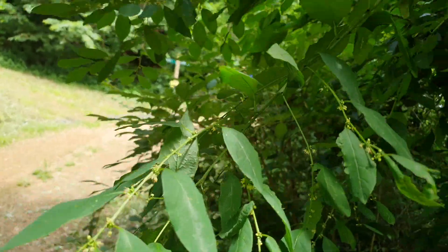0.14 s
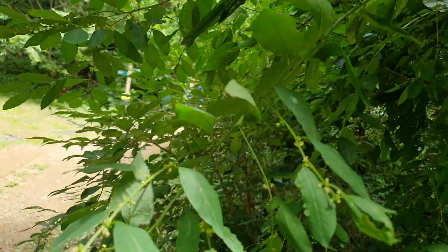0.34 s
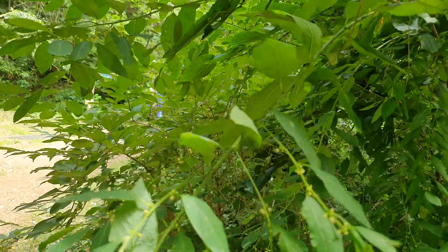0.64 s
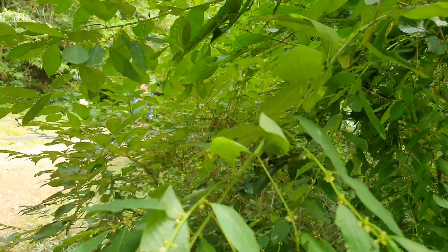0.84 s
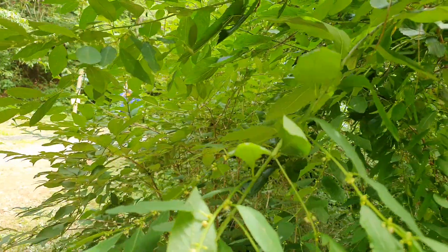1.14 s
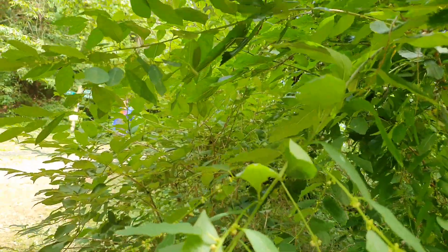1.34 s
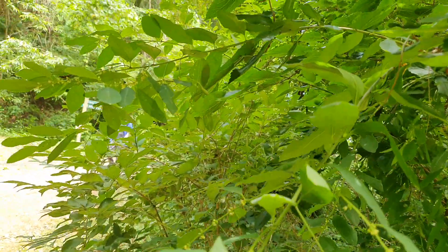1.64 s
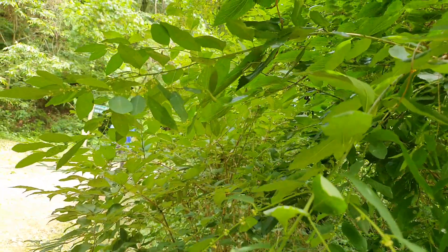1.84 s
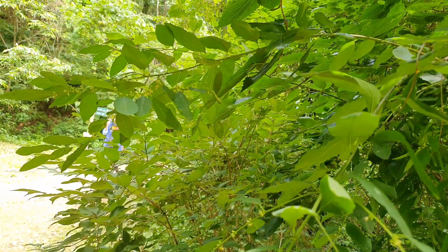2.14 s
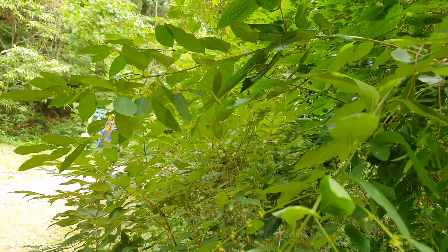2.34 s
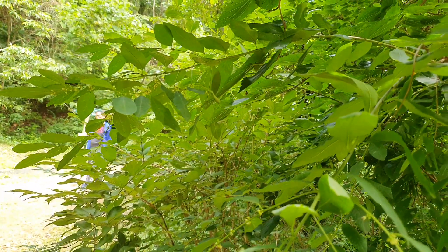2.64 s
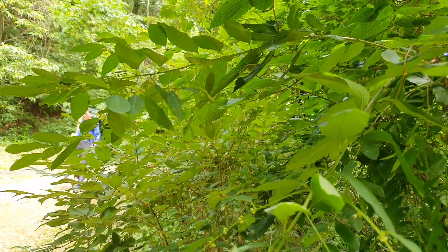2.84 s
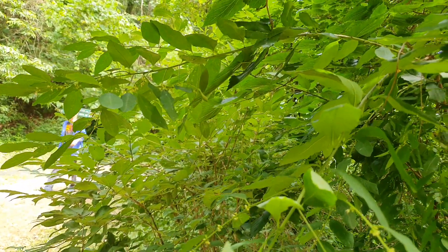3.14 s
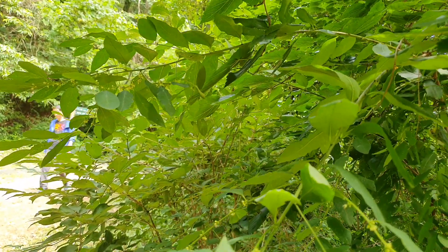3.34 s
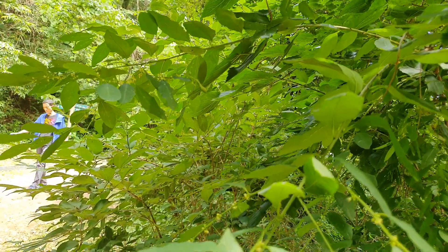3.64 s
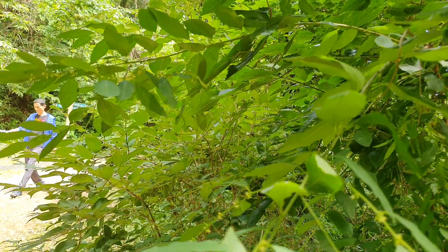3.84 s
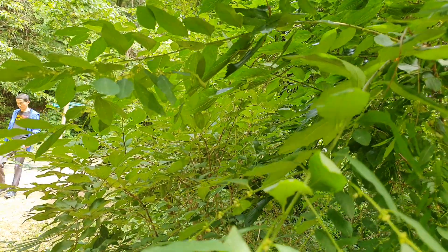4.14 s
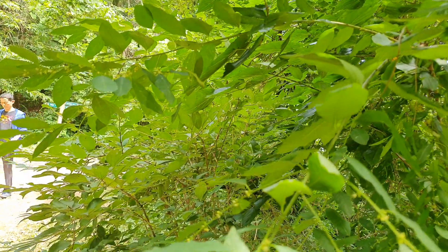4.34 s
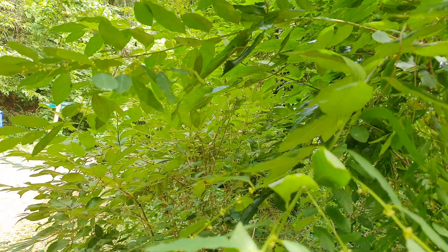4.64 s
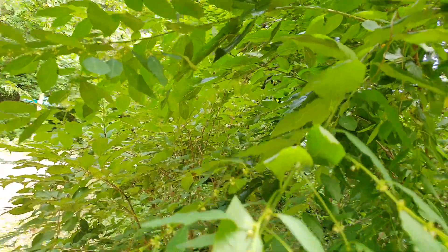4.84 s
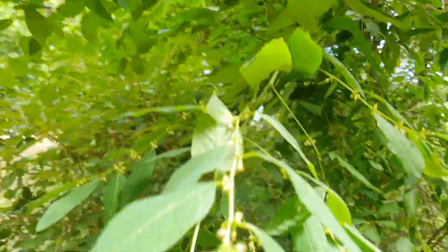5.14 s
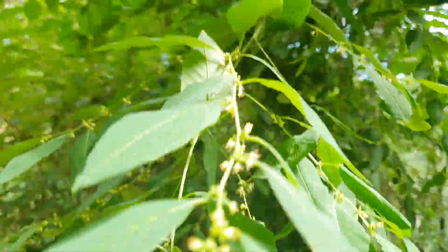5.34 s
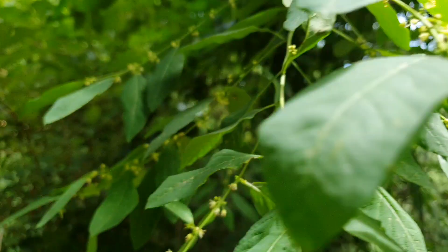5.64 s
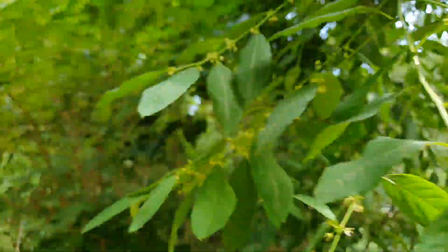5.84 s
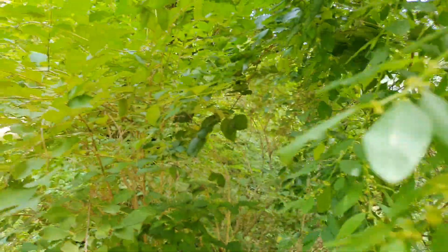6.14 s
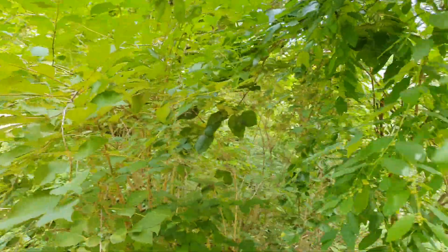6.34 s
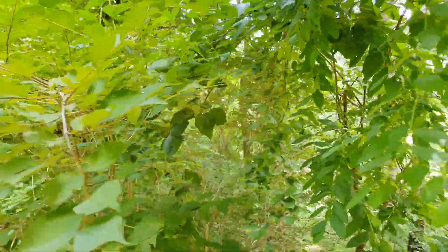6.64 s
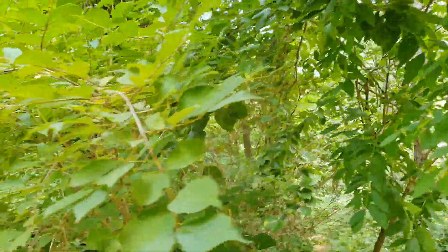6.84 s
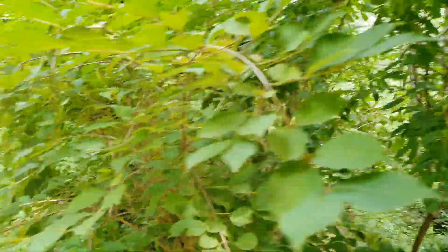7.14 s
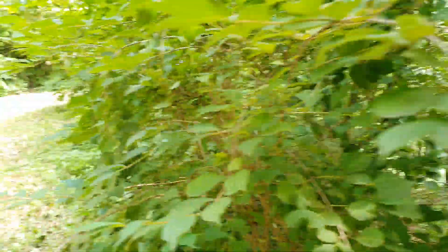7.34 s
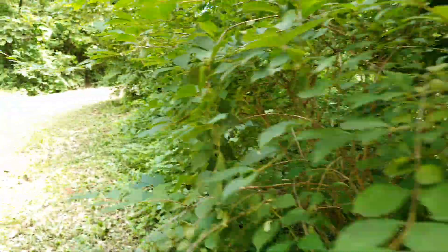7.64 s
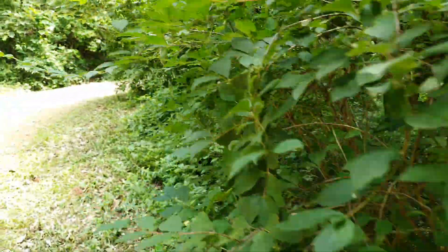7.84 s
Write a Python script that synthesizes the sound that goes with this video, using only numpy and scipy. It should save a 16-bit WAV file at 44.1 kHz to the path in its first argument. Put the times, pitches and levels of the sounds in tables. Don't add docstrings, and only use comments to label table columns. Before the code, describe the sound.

A dense summer insect chorus, with a held buzz turning into fast pulsing, soft cricket chirps, faint distant steps, then leafy ticks and handling bumps.

```python
import sys
import numpy as np
from scipy import signal
from scipy.fft import rfft, irfft, next_fast_len
from scipy.io import wavfile
from scipy.ndimage import uniform_filter1d, map_coordinates

SR = 44100
rng = np.random.default_rng(int(sys.argv[2]) if len(sys.argv) > 2 else 0)


def dump_mix(stems):
    frames = np.atleast_2d(stems).T
    limited = np.clip(frames, -1, 1)
    pcm = np.round(limited * 32767).astype(np.int16)
    wavfile.write(sys.argv[1], SR, pcm)


def gain_from_decibels(decibels):
    exponent = np.asarray(decibels, float) / 20
    return 10 ** exponent


N = 353241
TIME = np.arange(N) / SR


def unit(x):
    return x / np.sqrt(np.mean(x ** 2) + 1e-20)


def along(points, hz):
    f, v = np.transpose(points)
    return np.interp(np.log(hz + 1), np.log(f + 1), v)


def curve(points):
    s, db = np.transpose(points)
    return np.interp(TIME, s, db)


def wobble(rate):
    knots = rng.standard_normal(int(N * rate / SR) + 4)
    return map_coordinates(knots, [TIME * rate])


def filtered(x, response):
    m = next_fast_len(N + 8192)
    return irfft(rfft(x, m) * response(np.fft.rfftfreq(m, 1 / SR)), m)[..., :N]


def body(modes):
    def bump(f, hz, width):
        return 1 / (1 + (2 * (f - hz) / width) ** 2) ** 2
    return lambda f: np.sqrt(sum(gain_from_decibels([[l], [r]]) ** 2 * bump(f, hz, w) for hz, w, l, r in modes))


def sides(pan_db):
    return gain_from_decibels([[pan_db / 2], [-pan_db / 2]])


def silence():
    return np.zeros((2, N + SR))


def place(out, start, sound):
    out[:, start:start + sound.shape[-1]] += sound


def buzz(rate, jitter, gated):
    turns = np.cumsum(rate * (1 + jitter * wobble(40))) / SR
    clicks = unit(np.exp(-4 * (turns % 1)))
    gated = np.clip(gated, 0, 1)
    return rng.standard_normal((2, N)) * np.sqrt(1 - gated + gated * clicks ** 2)


# t/s, level/dB
PATH_OPENNESS = [(0, 1), (.4, 0.5), (2, 0.58), (4.8, 0.4), (5.4, 0.2), (6.15, 0), (6.64, -2), (7.2, -1.7),
                 (8, -0.5)]
# f/Hz, width/Hz, left level/dB, right level/dB
GROUP_BODIES = [
    [(2726, 580, -3, -1), (3370, 890, -5.5, 0), (5237, 1580, -2.5, -1)],
    [(7840, 1030, 4.5, -8)],
    [(11270, 1840, 1.5, -2.5), (13300, 3800, -4, -21)],
]
# level/dB, share of the path's swing [ratio]
GROUP_LEVELS = [
    (-48.5, 1.12),
    (-48, 0.8),
    (-56, 0.55),
]


def far_cicadas():
    out = 0
    for (level_db, share), modes in zip(GROUP_LEVELS, GROUP_BODIES):
        drone = unit(filtered(buzz(rate=410, jitter=0.06, gated=0.24), body(modes)))
        swell_db = share * curve(PATH_OPENNESS) + 0.76 * wobble(6) + 0.28 * wobble(30)
        out = out + gain_from_decibels(level_db + swell_db) * drone
    return out


# t/s, effort level/dB
PUMPING = [(-.141, -29), (.321, -47.5), (.784, -44), (1.245, -45), (1.702, -43.5), (2.16, -45),
           (2.625, -45.5), (3.09, -44), (3.555, -42.5), (4.025, -43.5), (4.503, -44), (4.987, -45.5),
           (5.472, -41.5), (5.96, -44), (6.468, -44.5), (7.0, -44.5), (7.587, -45.5), (8.2, -51)]
FIRST_S = .2
SECOND_AT, LONGEST_WAIT_S = .475, .084
SECOND_DB, TIRING_DB_PER_S = -.8, -25
SCATTER_S, SCATTER_DB = .002, .8


def throbs():
    s, effort_db = np.transpose(PUMPING)
    first = np.interp(np.arange(3 * len(s) - 2) / 3, np.arange(len(s)), s)
    pair = np.diff(first)
    second = first[:-1] + np.minimum(SECOND_AT * pair, LONGEST_WAIT_S)
    when = np.concatenate([first[:-1], second])
    weaker = np.concatenate([0 * pair, SECOND_DB + TIRING_DB_PER_S * (pair - pair.min())])
    late, louder = rng.standard_normal((2, len(when)))
    db = np.interp(when, s, effort_db) + weaker + SCATTER_DB * louder
    return np.transpose([when + SCATTER_S * late, db])[when > FIRST_S]


# multiple of the pitch, left level/dB, right level/dB
OVERTONES = [(1, -11, -10.5), (2, -11.5, -23), (3, -5.5, -17.5), (4, -14.5, -19), (5, -22, -35)]
# t/s, level/dB
FACING = [(0, -2), (1, 0), (2.5, 1), (4.3, -3), (5.1, 6), (5.9, 3), (6.4, 1.2), (8, 3)]


def sung_tone(effort, pump):
    phase = 2 * np.pi * np.cumsum(2680 + 120 * pump + 35 * wobble(25)) / SR
    out = np.zeros((2, N))
    for k, *db in OVERTONES:
        hoarse = [[wobble(120 * k), wobble(120 * k)] for port in db]
        tone = np.array([a * np.cos(k * phase) + b * np.sin(k * phase) for a, b in hoarse])
        out += effort * gain_from_decibels(np.array(db)[:, None] + (k == 3) * curve(FACING)) * tone
    return out


# start t/s, end t/s, f/Hz, width/Hz, level/dB
HELD = [
    (-.05, .2, 10700, 500, -60),
    (-.05, .17, 13500, 500, -62),
    (-.05, 0.143, 7840, 890, -47),
    (7.563, 7.92, 11450, 600, -65),
]


def held_buzzes():
    out = np.zeros((2, N))
    for start, end, hz, width, db in HELD:
        gate = np.clip(np.minimum(TIME - start, end - TIME) / 0.027, 0, 1)
        ring = body([(hz, width, 3.1, -5)])
        out += gain_from_decibels(db) * gate * unit(filtered(rng.standard_normal((2, N)), ring))
    return out


# f/Hz, width/Hz, left level/dB, right level/dB
RASP_BODY = [(2940, 540, -4.5, -1), (5730, 650, 5.5, -22), (7900, 1040, 8.5, -19), (11650, 3300, 3.5, -3.5),
             (13500, 1900, -3.5, -18)]


def near_cicada():
    effort, pump = np.zeros(N), np.zeros(N)
    for s, db in throbs():
        u = TIME - s
        swell = np.exp(-.5 * (u / np.where(u < 0, .009, .0135)) ** 2)
        effort += gain_from_decibels(db + 1.0) * swell
        pump += swell
    rasp = filtered(effort * buzz(rate=280, jitter=0.017, gated=0.4), body(RASP_BODY))
    rasp *= gain_from_decibels(-2.0) * np.std(effort) / np.std(rasp)
    return rasp + sung_tone(effort, pump) + held_buzzes()


# t/s, length/s, f/Hz, level/dB, left-right level/dB
CRICKETS = [(0.192, 0.049, 3340, -50, -5), (.342, .064, 3250, -40, 4), (.507, .126, 3450, -54, -4),
            (1.345, .03, 3220, -44, -4), (1.39, 0.17, 3474, -50.5, -2), (1.604, .05, 3170, -50, 2),
            (2.112, 0.14, 3120, -50, 3), (2.221, 0.23, 3250, -54, -4), (2.244, .062, 3340, -51, -4),
            (2.681, .054, 3474, -49.5, -11), (2.999, .03, 3300, -47, 0), (3.508, 0.079, 3530, -50, -16),
            (3.51, 0.16, 3186, -54, 7), (3.871, .04, 3186, -46, 3), (4.243, 0.073, 3110, -48, -11),
            (4.285, 0.034, 3280, -47, -7), (4.303, 0.12, 3210, -50, -9), (4.663, .04, 3560, -49.5, -13.5),
            (4.69, .1, 3746, -54, -6), (5.021, 0.11, 3520, -53, -5), (5.308, .076, 3215, -47, -3),
            (5.404, .071, 3474, -49.5, -2), (6.553, .046, 3440, -46, -6), (7.499, .032, 3370, -49, 9)]


def crickets():
    out = silence()
    for s, length, hz, db, pan_db in CRICKETS:
        a, b, c = rng.random(3)
        t = np.arange(round(length * SR)) / SR
        edge = np.clip(np.minimum(t, length - t) / 0.0029, 0, 1)
        flutter = 1 + 0.37 * np.cos(2 * np.pi * (125 * t + a))
        phase = 2 * np.pi * (hz * t + np.array([[b], [c]]))
        place(out, round(s * SR), gain_from_decibels(db - 0.5) * sides(pan_db) * edge * flutter * np.sin(phase))
    near = out[:, :N] * gain_from_decibels(2.2 * np.array([wobble(80), wobble(80)]) - 4.5)
    fade = gain_from_decibels(-60 * np.arange(SR // 4) / SR / .1)
    tail = rng.standard_normal((2, SR // 4)) * fade
    echoes = signal.fftconvolve(near, tail / np.linalg.norm(tail[0]), axes=1)[:, :N]
    blur = unit(filtered(rng.standard_normal((2, N)), body([(3260, 660, 5.5, 1.2)])))
    return near + gain_from_decibels(-12) * echoes + gain_from_decibels(-8.5) * answering() * blur


# t/s, half length/s, level/dB
BOUTS = [(.45, .1, -53), (1.402, 0.089, -50), (1.78, .07, -53), (2.3, .18, -51), (3.053, 0.068, -56),
         (3.58, .12, -47), (4.3, 0.086, -51), (4.752, 0.11, -54), (5.953, 0.11, -54), (7.905, 0.12, -58)]
BETWEEN_DB = -54.5


def answering():
    bouts = sum(gain_from_decibels(db) ** 2 * np.exp(-((TIME - s) / half) ** 2) for s, half, db in BOUTS)
    return np.sqrt(gain_from_decibels(BETWEEN_DB) ** 2 + bouts)


def far_crickets():
    out, t = silence(), np.arange(SR // 7) / SR
    for s, pitch, size, pan, turn in rng.random((500, 5)):
        hz = 3180 + 380 * pitch ** 1.3
        note = np.sin(np.pi * t / t[-1]) * np.sin(2 * np.pi * (hz * t + turn))
        place(out, round(s * N), gain_from_decibels(14.0 * size) * sides(16 * pan - 12) * note)
    blurred = out[:, :N] * gain_from_decibels(4 * np.array([wobble(50), wobble(50)]))
    return gain_from_decibels(-7.0) * answering() * unit(blurred)


# t/s, peak level/dB, f/Hz, left-right level/dB
TICKS = [(4.788, -49, 1580, -13), (5.006, -51, 1860, -7), (5.054, -44, 1930, -8), (5.082, -49, 1900, -6),
         (5.297, -48.5, 1770, -15), (5.454, -52, 810, 0), (5.473, -46, 840, 1), (5.486, -43.5, 765, 2),
         (5.727, -39, 1150, -2), (5.803, -48, 1880, -0.5), (5.868, -46.5, 1330, -10),
         (5.885, -52.5, 427, -25), (5.908, -47.5, 1650, -7), (6.066, -53.5, 543, -22),
         (6.1, -43, 1730, -13), (6.207, -51, 1600, -8), (6.259, -32.5, 1040, 7), (6.457, -40.5, 1650, 1),
         (6.476, -49, 735, -0.5), (6.501, -44, 1720, -6), (6.657, -55, 560, -2), (6.91, -42, 2100, 5),
         (7.399, -50, 482, -1), (7.434, -50, 1740, -2), (7.496, -42, 590, 3), (7.523, -45, 1400, 0.5),
         (7.587, -50, 1360, 1.5), (7.622, -51, 1360, 4)]
# t/s, peak level/dB, f/Hz, left-right level/dB
HEELS = [
    (.186, -56, 736, 0),
    (.589, -46, 2100, -1),
    (4.37, -55, 764, -1),
    (4.437, -54.5, 773, 3),
]


def ticks():
    out, t = silence(), np.arange(SR // 20) / SR
    for s, db, hz, pan_db in HEELS + TICKS:
        ring = np.sin(2 * np.pi * hz * t) + .4 * np.sin(2 * np.pi * 1.7 * hz * t)
        knock = ring * gain_from_decibels(-60 * t * hz / 9) * (1 - np.exp(-t * hz * 4))
        hiss = gain_from_decibels(-15 - 60 * t / 0.0083) * rng.standard_normal((2, len(t)))
        place(out, round(s * SR), gain_from_decibels(db + 5.5) * sides(pan_db) * (knock + hiss))
    return out[:, :N]


# t/s, length/s, level/dB, left-right level/dB
SCRAPES = [
    (4.785, .01, -55, -9),
    (5.297, .008, -52, -9),
    (6.065, .022, -52, -12),
    (6.258, .009, -38, 6),
    (7.972, .004, -46, 14),
]


def scrapes():
    out, t = silence(), np.arange(SR // 20) / SR
    for s, length, db, pan_db in SCRAPES:
        shape = gain_from_decibels(-8 * t / length) * np.minimum(t / .001, 1) * (t < 2 * length)
        place(out, round(s * SR), gain_from_decibels(db) * sides(pan_db) * shape * rng.standard_normal((2, len(t))))
    return filtered(out[:, :N], lambda f: f / (f + 3000) * (1 + f / 12000))


# t/s, peak level/dB, f/Hz
THUMPS = [(5.296, -52, 200), (5.585, -45, 197), (5.656, -41.5, 190), (5.819, -43, 70.5), (6.068, -43, 148),
          (6.225, -41.5, 228), (7.369, -47, 91), (7.42, -58, 80), (7.431, -44.5, 80), (7.612, -51, 90)]


def thumps():
    out, t = silence(), np.arange(SR // 20) / SR
    for s, db, hz in THUMPS:
        place(out, round(s * SR), gain_from_decibels(db - 60 * t * hz / 5) * np.sin(2 * np.pi * hz * t))
    return out[:, :N]


# t/s, length/s, f/Hz, width/Hz, level/dB
SWISHES = [(.564, 0.1, 1510, 1800, -69), (4.96, .095, 2100, 900, -62.5), (5.46, .072, 1100, 1500, -58),
           (5.485, .045, 1450, 500, -54.5), (0.503, .2, 318, 200, -68.5), (0.722, .2, 316, 200, -72.5),
           (5.69, 0.031, 1460, 1200, -67), (6.151, 0.064, 1970, 700, -61), (6.448, 0.036, 1330, 1390, -62),
           (6.762, 0.18, 3120, 2770, -57), (7.38, 0.064, 2010, 800, -65), (7.513, .043, 910, 1200, -60.5),
           (7.677, .074, 800, 800, -68), (7.833, .07, 530, 300, -68), (1.997, .1, 750, 400, -75),
           (2.553, 0.062, 720, 397, -72), (3.2, .044, 704, 500, -70.5)]


def swishes():
    out = silence()
    for s, length, hz, width, db in SWISHES:
        n = round(length * SR)
        ragged = gain_from_decibels(4.5 * np.repeat(rng.standard_normal(120), 80))[:n] * np.hanning(n) ** 0.2
        shared, own = rng.standard_normal(n), rng.standard_normal((2, n))
        band = [max(hz - width / 2, 60), hz + width / 2]
        ring = signal.butter(2, band, "band", fs=SR, output="sos")
        grains = np.pad(ragged * (shared + 0.4 * own), ((0, 0), (0, 400)))
        place(out, round(s * SR), gain_from_decibels(db) * sides(-1.2) * unit(signal.sosfilt(ring, grains)))
    return out[:, :N]


LAG_S = .00036


def lagged(pair):
    return filtered(pair, lambda hz: np.exp(1j * np.pi * LAG_S * hz * [[1], [-1]]))


# f/Hz, likeness [0 to 1]
ALIKE = [(30, .68), (75, .77), (130, 1), (350, 1), (700, 0.7), (1400, 0.3), (2600, 1), (3500, 0.035)]


def rush(spectrum, patchy_db):
    z = signal.stft(rng.standard_normal((2, N)), nperseg=512)[2]
    field = uniform_filter1d(rng.standard_normal(z.shape[1:]), size=6, axis=0)
    field = uniform_filter1d(field, size=10, axis=1)
    pair = signal.istft(z * gain_from_decibels(patchy_db * unit(field)), nperseg=512)[1][:, :N]

    def mid_side(hz):
        turn = np.arccos(np.clip(along(ALIKE, hz), -1, 1)) / 2
        return gain_from_decibels(along(spectrum, hz)) * [np.cos(turn), np.sin(turn)]
    mid, side = filtered(pair, mid_side)
    return unit(lagged(np.array([mid + side, mid - side])))


# f/Hz, level/dB per Hz
RUMBLE = [(12, -61), (20, -33), (54, -1.5), (75, 5), (97, -6.5), (110, -4), (140, -63), (240, -120)]
TRAFFIC = [(56, -49), (95, -8.5), (124, -0.5), (183, -1.5), (243, -13), (284, -10), (380, -33.5),
           (490, -49), (840, -120)]
LEAVES = [(250, -1), (350, -3), (1000, 0), (2000, -3), (4200, 4.5), (6700, 4.5), (9600, -19), (15800, -21)]
# t/s, level/dB
PASSING = [(0, -61), (.78, -64.5), (2.18, -61), (3.3, -58), (4.21, -61.5), (5.32, -65.5), (7.26, -64.5),
           (8, -63)]
# t/s, level/dB
STIR = [(0, -74.5), (.7, -68), (1.09, -73.5), (4.66, -71.5), (5.79, -67.5), (7.26, -68), (7.53, -66),
        (8, -66)]
RUMBLE_DB = -64.5


def air():
    rumble = gain_from_decibels(RUMBLE_DB + 0.88 * wobble(1.48)) * sides(1.9) * rush(RUMBLE, patchy_db=-1.0)
    traffic = gain_from_decibels(curve(PASSING) + 2.5) * rush(TRAFFIC, patchy_db=0.4)
    rustle = gain_from_decibels(curve(STIR) + 13.0 + 1.07 * wobble(13)) * rush(LEAVES, patchy_db=2.0)
    return rumble + traffic + rustle


def scene():
    insects = far_cicadas() + near_cicada() + crickets() + far_crickets()
    contacts = ticks() + scrapes() + thumps()
    return insects + contacts + swishes() + air()


def low_pass(x):
    return signal.sosfilt(signal.butter(12, 16180, fs=SR, output="sos"), x)


# f/Hz, level/dB
RIGHT_PORT = [(6000, -0.5), (7000, -6.5), (8000, -1.5), (13900, 1.5), (15700, -12)]
TOP_HZ = 15780


def record(dry):
    ports = filtered(dry, lambda hz: gain_from_decibels([0 * hz, along(RIGHT_PORT, hz)]) * (hz < TOP_HZ))
    return low_pass(ports)


dry = scene()
out = record(dry)
dump_mix(out)
```